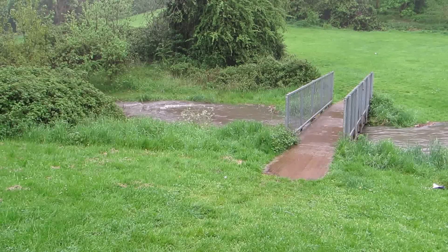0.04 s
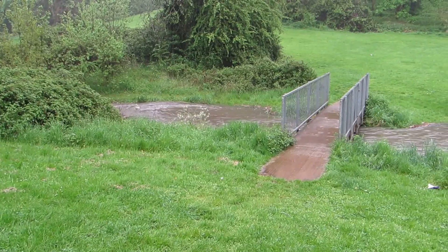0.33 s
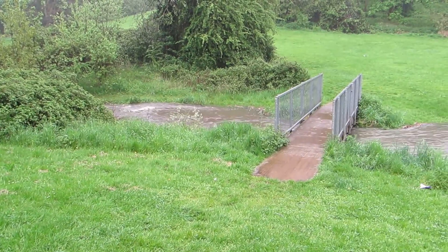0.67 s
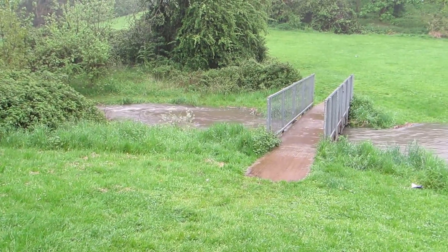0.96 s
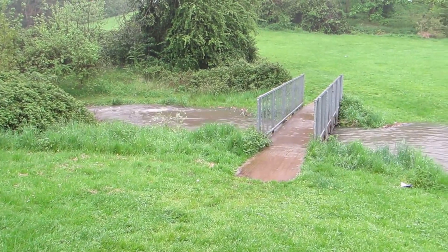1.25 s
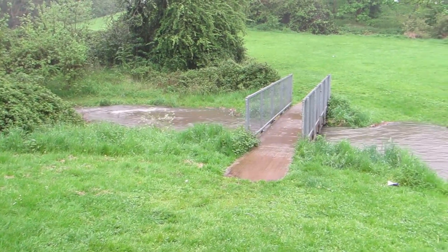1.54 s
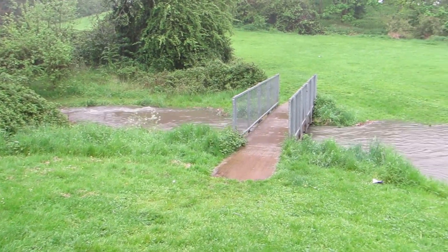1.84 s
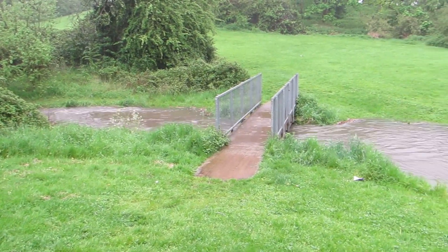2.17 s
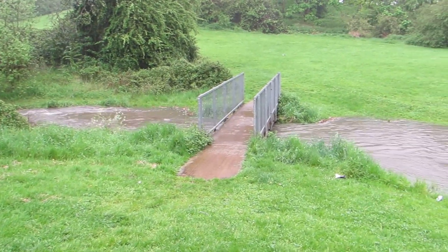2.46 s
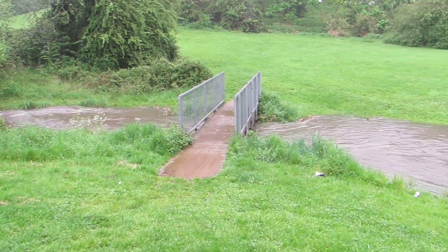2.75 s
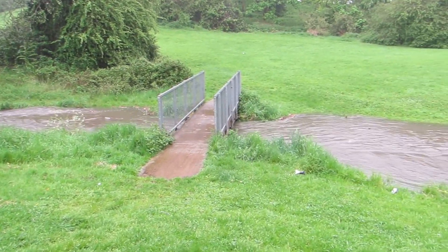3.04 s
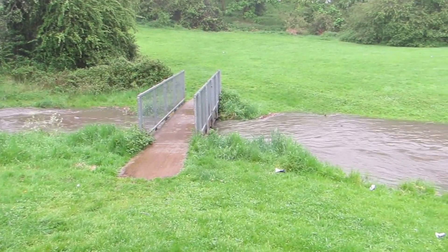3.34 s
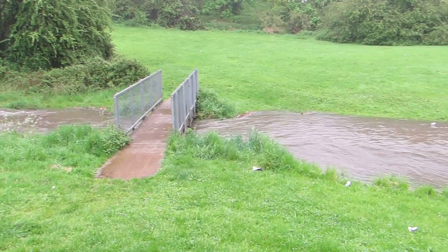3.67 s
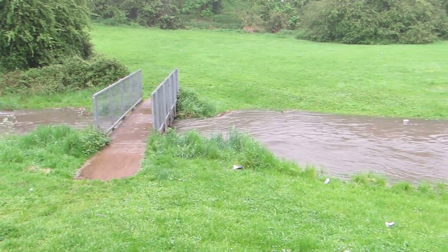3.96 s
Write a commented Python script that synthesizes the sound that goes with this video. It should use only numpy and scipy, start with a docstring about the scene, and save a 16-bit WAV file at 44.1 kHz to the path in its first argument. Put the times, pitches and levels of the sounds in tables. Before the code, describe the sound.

A swollen brook rushes and gurgles through a grassy field while small birds chirp and whistle. Light wind rumbles on the microphone, which is tapped once early on, and the water swells as the birds grow louder.

```python
"""From the start, a swollen brook rushes and gurgles while a light wind rumbles over a deep hum.
Small birds flute, chip and sing in the bushes on the left, their notes scattered by the trees.
After a faint tick, something taps the microphone near 0.9 s; its gain control turns everything
down, then slowly back up. The water swells, thin whistles join at 1.3 s and louder downward
slurs at 1.7 s, with a few more ticks among them."""
import sys
import numpy as np
from scipy import signal
from scipy.fft import rfft, irfft, next_fast_len
from scipy.io import wavfile
from scipy.ndimage import uniform_filter1d, map_coordinates

SR = 44100
rng = np.random.default_rng(int(sys.argv[2]) if len(sys.argv) > 2 else 0)


def wrap_up_sound(samples):
    """Save the sound to the file named by the first command line argument, as 16-bit audio."""
    columns = np.atleast_2d(samples).T
    # keep every value between -1 and 1, then stretch to whole-number steps
    tamed = np.clip(columns, -1, 1)
    steps = np.round(tamed * 32767).astype(np.int16)
    wavfile.write(sys.argv[1], SR, steps)


N = 176400  # 4 seconds


def amp(db):
    """Turn decibels into a number to multiply by."""
    return 10 ** (np.asarray(db) / 20)


def unit(x):
    """Scale x to an average strength (rms) of 1."""
    return x / np.sqrt(np.mean(x ** 2) + 1e-20)


def along(points, hz):
    """Read between (frequency, value) points, spaced as on a keyboard."""
    freqs, values = np.transpose(points)
    return np.interp(np.log(hz + 1), np.log(freqs + 1), values)


def curve(rows):
    """Join (time, value) points with straight lines."""
    return np.interp(np.arange(N) / SR, *np.transpose(rows))


def wobble(per_s, size=N):
    """A smooth curve through per_s random values a second."""
    return map_coordinates(rng.standard_normal(512), [np.arange(size) * per_s / SR], mode="wrap")


def filtered(x, response):
    """Multiply each frequency in x by response(hz)."""
    size = next_fast_len(N + SR // 2)
    return irfft(rfft(x, size) * response(np.fft.rfftfreq(size, 1 / SR)), size)[..., :N]


def toned(x, tone):
    """Shape the bass and treble of x with a (frequency, level) table."""
    return filtered(x, lambda hz: amp(along(tone, hz)))


def pan(db):
    """Make the left side db louder than the right."""
    return amp([[db / 2], [-db / 2]])


def add(track, start_s, x):
    """Mix x into track at start_s."""
    part = track[..., max(round(start_s * SR), 0):][..., :x.shape[-1]]
    part += x[..., :part.shape[-1]]


def rush(tone, alike, patchy_db):
    """Stereo noise with random loud and soft patches; alike is 1 for equal sides, -1 for opposite."""
    grid = signal.stft(rng.standard_normal((2, N)), nperseg=512)[2]
    patches = uniform_filter1d(rng.standard_normal(grid.shape[1:]), size=5, axis=0)  # blur over pitch
    patches = uniform_filter1d(patches, size=9, axis=1)  # and over time
    pair = signal.istft(grid * amp(patchy_db * unit(patches)), nperseg=512)[1][:, :N]

    def response(hz):
        angle = np.arccos(np.clip(along(alike, hz), -1, 1)) / 2
        return amp(along(tone, hz)) * [np.cos(angle), np.sin(angle)]
    mid, side = filtered(pair, response)
    return unit(np.array([mid + side, mid - side]))


def bubbles(per_s=900, middle_hz=1151.4, spread=0.5575, ring_cycles=8.2, rise=.12, size_db=3):
    """Many small bubbles, each a short ring that rises in pitch."""
    when, pitch, size, place = rng.random((int(per_s * N / SR), 4)).T[:, :, None]
    hz = middle_hz * np.exp(spread / 2 * np.clip(np.log(pitch / (1 - pitch)), -5, 5))
    samples = np.arange(1500)
    cycles = hz * samples / SR
    age = cycles / ring_cycles
    ring = np.sin(2 * np.pi * cycles * (1 + rise * np.minimum(age, 2) / 2))
    ring *= np.exp(-2 * age) * (1 - np.exp(-cycles))  # quick start, then a fade
    ring *= amp(size_db * np.minimum(-np.log(1 - size), 4))  # a few are much louder
    at = ((when * N).astype(int) + samples).ravel()
    sides = np.cos(place * np.pi / 2), np.sin(place * np.pi / 2)
    return unit(np.array([np.bincount(at, (ring * side).ravel(), N)[:N] for side in sides]))


# How the rushing swells: t/s, level/dB (relative)
WATER_LEVEL = [(0, -41.5), (.35, -38.5), (.75, -36), (1.1, -33.5), (1.55, -32.5), (2.2, -33.5), (2.7, -34),
               (3.4, -33.5), (4, -33)]
# Its mix of low and high sound: f/Hz, level/dB (relative)
WATER_TONE = [(60, -13), (130, -0.5), (270, 2.5), (480, -2.5), (1000, -1.5), (1650, -2), (2200, -5.5),
              (3300, -10), (5000, -13.5), (7000, -16.5), (8500, -28.5), (15000, -49)]
# How alike the water is left and right: f/Hz, likeness/(-1 to 1)
WATER_LIKENESS = [(150, 0.8), (500, 0.56), (1000, 0.7), (1700, 0.76), (2700, 0.37), (4500, 0.32),
                  (7000, 0.064)]
# How loud the low churning is: t/s, level/dB
CHURN_LEVEL = [(0, -51), (.5, -52), (.8, -42.5), (1.2, -40), (1.6, -38), (2.3, -43), (2.9, -37.5),
               (3.4, -40.5), (4, -40)]
# Its dull tone: f/Hz, level/dB (relative)
CHURN_TONE = [(70, -22), (110, 0), (200, -2), (300, -1.5), (370, -6), (480, -18), (900, -47)]
def brook():
    """Flood water rushes with bubbles in it and churns underneath."""
    water = rush(WATER_TONE, WATER_LIKENESS, patchy_db=1) + amp(-7.5) * bubbles()
    water_db = curve(WATER_LEVEL) + 1.5 + 0.35 * wobble(14)
    churn_db = curve(CHURN_LEVEL) + 1.8 * wobble(8.03)
    churn = rush(CHURN_TONE, WATER_LIKENESS, patchy_db=1)
    return pan(1) * amp(water_db) * water + amp(churn_db) * churn


# How loud the water's hiss is: t/s, level/dB (relative)
HISS_LEVEL = [(0, -59), (.4, -58), (.75, -56), (1.2, -52), (1.6, -52.5), (2.1, -54), (2.7, -57), (4, -58.5)]
# The bright tone of hiss and splashes: f/Hz, level/dB (relative)
HISS_TONE = [(6500, -27), (8200, -1.5), (11500, 2), (13500, -5), (14400, -9), (15200, -28)]
def spray(splashes_per_s=300, size_db=0.5):
    """The top of the brook hisses and crackles with tiny splashes of unequal size."""
    hiss = rush(HISS_TONE, alike=[(5000, .1), (8500, -0.12), (14000, -0.21)], patchy_db=.7)
    when, size, place = rng.random((int(splashes_per_s * N / SR), 3)).T
    strength = amp(size_db * np.minimum(-np.log(1 - size), 4))
    at = (when * N).astype(int)
    clicks = np.array([np.bincount(at, strength * side, N) for side in (place, place - 1)])
    splashes = unit(toned(clicks, HISS_TONE))
    return amp(curve(HISS_LEVEL)) * (hiss + amp(-2) * splashes)


# How strong the wind is: t/s, level/dB
WIND_LEVEL = [(0, -37.5), (.45, -42.5), (.75, -37.5), (1.2, -36.5), (1.55, -32), (2.3, -34), (2.6, -38.5),
              (3.3, -36.5), (3.85, -37), (4, -32)]
# Its bass-heavy tone: f/Hz, level/dB (relative)
WIND_TONE = [(22, -22), (35, -15), (51, -7.5), (68, 1), (90, -2.5), (125, -3.5), (190, -13.5), (350, -24.5),
             (900, -62)]
# How loud the deep hum is: t/s, level/dB
HUM_LEVEL = [(0, -51), (.45, -45), (.75, -40), (1.2, -41.5), (1.7, -42), (2.35, -41.5), (2.8, -41),
             (3.3, -41), (3.7, -43), (4, -39)]
def wind(hum_hz=41.5, waver_hz=2.2):
    """Wind rumbles unevenly over a wavering hum, both a little stronger on the right."""
    gusts = amp(curve(WIND_LEVEL) + 0.64 * wobble(10))
    rumble = gusts * rush(WIND_TONE, alike=[(40, 1), (200, 0.82)], patchy_db=0)
    phase = 2 * np.pi * np.cumsum(hum_hz + waver_hz * wobble(9)) / SR
    hum = np.sqrt(2) * amp(curve(HUM_LEVEL) + 1.2 * wobble(7)) * np.sin(phase)
    return pan(-2.2) * (rumble + hum)


def arch(length_s, pitches):
    """A pitch that bends through a start, a middle and an end."""
    return np.polyval(np.polyfit([0, .5, 1], pitches, 2), np.linspace(0, 1, int(length_s * SR)))


def settle(length_s, start_hz, target_hz, settle_s):
    """A pitch that slides toward a target and levels off."""
    return target_hz + (start_hz - target_hz) * np.exp(-np.arange(int(length_s * SR)) / SR / settle_s)


def tree_echo(x, trees_s=1.0, thicket_s=0.25, thicket_db=9, width=0.43):
    """The thicket scatters a short, dense echo and the trees add a longer one."""
    t = np.arange(SR) / SR
    shared, apart = rng.standard_normal((2, SR))
    fade = amp(-60 * t / trees_s) + amp(thicket_db - 60 * t / thicket_s)
    onset = 1 - np.exp(-t / 0.0037)
    tail = np.array([shared + width * apart, shared - width * apart]) * fade * onset
    return signal.fftconvolve(np.pad(x, (0, SR // 100))[None], tail / np.linalg.norm(tail[0]), axes=1)


def sing(notes, edge, waver, echo_db, flutter_db=2.1, left_lead_s=34e-6):
    """Unsteady, echoing bird notes; edge is the share spent fading in or out, waver a share of pitch."""
    song = np.zeros((2, N))
    for start_s, hz, db in notes:
        progress = np.linspace(0, 1, len(hz))
        shape = np.sin(np.pi / 2 * np.clip(np.minimum(progress, 1 - progress) / edge, 0, 1))
        phase = 2 * np.pi * np.cumsum(hz * (1 + waver * wobble(302, len(hz)))) / SR
        level = amp(db + flutter_db * wobble(70, len(hz)))
        call = np.sqrt(2) * shape * level * np.sin(phase)
        call /= np.hypot(1, amp(echo_db))  # note and echo share the level
        add(song, start_s, call)
        add(song, start_s, amp(echo_db) * tree_echo(call))
    early_s = np.array([[1], [-1]]) * left_lead_s / 2  # the left side hears it first
    return pan(2) * filtered(song, lambda hz: np.exp(2j * np.pi * hz * early_s))


# Soft, lower notes: t/s, length/s, start f/Hz, middle f/Hz, end f/Hz, level/dB
FLUTE_NOTES = [(0.028, 0.13, 2258, 2218, 2220, -43.5), (0.038, 0.2, 4260, 4170, 4250, -50),
               (.262, 0.15, 2210, 2235, 2188, -40.5), (0.391, 0.0614, 2936, 3240, 3310, -47.5),
               (.53, 0.083, 3120, 2750, 2730, -47), (1.086, 0.11, 3430, 3930, 4170, -40),
               (2.057, 0.031, 2960, 3020, 3020, -40), (2.2, 0.049, 3570, 3590, 3590, -42),
               (2.615, 0.053, 4330, 4080, 4000, -36), (2.675, 0.041, 3710, 3550, 3480, -43),
               (3.46, 0.036, 3130, 3265, 3200, -42.5)]
def fluting():
    """Distant birds sing gently bending, flute-like notes."""
    notes = [(s, arch(length, hz), db) for s, length, *hz, db in FLUTE_NOTES]
    return sing(notes, edge=0.13, waver=0.0066, echo_db=-1)


# Short, high notes: t/s, length/s, start f/Hz, middle f/Hz, end f/Hz, level/dB
CHIP_NOTES = [(.06, 0.068, 6600, 7310, 6200, -43.5), (0.081, .03, 7110, 6350, 6110, -31.5),
              (.969, 0.051, 6500, 7650, 6400, -28.5), (1.626, .038, 6900, 7550, 7170, -35.5),
              (1.858, 0.023, 7600, 7530, 7050, -39), (2.08, 0.023, 7600, 7610, 7050, -37),
              (2.298, 0.027, 7600, 7580, 7050, -37), (2.512, 0.029, 7600, 7550, 7150, -37.5),
              (3.757, 0.055, 6300, 7020, 6300, -37), (3.83, .07, 6900, 6830, 6300, -42)]
def chips():
    """A bird gives quick chirps, most of them arching up and down."""
    notes = [(s, arch(length, hz), db) for s, length, *hz, db in CHIP_NOTES]
    return sing(notes, edge=0.087, waver=.012, echo_db=3.2)


# Notes that drop and hold: t/s, held f/Hz, level/dB
TWO_TONE_NOTES = [(.145, 4550, -48), (.47, 5000, -43), (.765, 5600, -49), (1.104, 4050, -46),
                  (1.417, 4580, -44), (2.338, 4300, -44), (2.658, 4550, -41), (2.988, 4900, -42.5),
                  (3.282, 5600, -47), (3.655, 4800, -43)]
def two_tone_song(length_s=0.047, top_hz=7100, drop_s=0.0078):
    """A farther bird starts each note high, drops fast and holds the lower pitch."""
    notes = [(s, settle(length_s, top_hz, hz, drop_s), db) for s, hz, db in TWO_TONE_NOTES]
    return sing(notes, edge=.07, waver=0.0056, echo_db=-4.5)


# When the faint ticks come: t/s, level/dB (relative)
TICK_TIMES = [(0.444, -26), (1.533, -38), (1.650, -14.5), (1.653, -23), (2.84, -29)]
# Their crisp tone: f/Hz, level/dB (relative)
TICK_TONE = [(300, -6), (2500, 3), (6000, 2.5), (9000, -8), (15000, -16)]
def ticks(fade_s=0.0041):
    """Tiny dry ticks close by, each a burst of noise that dies at once."""
    track = np.zeros(N)
    t = np.arange(SR // 50) / SR
    for start_s, db in TICK_TIMES:
        add(track, start_s, amp(db - 60 * t / fade_s) * rng.standard_normal(len(t)))
    return pan(2.1) * toned(track, TICK_TONE)


# The tap's softened treble: f/Hz, level/dB (relative)
TAP_TONE = [(2500, 1), (6000, -5), (14000, -15)]
def tap(at_s=.8582, rise_s=0.00029, fall_s=0.000096, rebound_s=.0016, snap_s=0.0046):
    """One push on the microphone, with a snap and a slower spring back."""
    t = np.arange(N) / SR - at_s
    after = np.maximum(t, 0)
    push = np.exp(np.minimum(t, 0) / rise_s - after / fall_s)
    rebound = 0.22 * after / rebound_s * np.exp(1 - after / rebound_s)
    snap = amp(-6 - 60 * after / snap_s) * (t > 0) * rng.standard_normal(N)
    pop = np.array([[1], [-0.6]]) * (rebound - push)  # the two sides move opposite ways
    pop += np.array([[1], [.2]]) * snap
    return amp(1) * toned(pop, TAP_TONE)


# Thin, high notes: t/s, length/s, start f/Hz, target f/Hz, level/dB
WHISTLE_NOTES = [(1.264, 0.082, 7660, 7660, -31.5), (1.36, .08, 7640, 7730, -32),
                 (1.491, 0.09, 5890, 5336, -31), (1.547, 0.076, 5450, 5290, -35.5),
                 (1.789, 0.093, 7600, 7610, -33), (2.019, 0.072, 7510, 7730, -36.5),
                 (2.235, .075, 7680, 7660, -38.5), (2.455, 0.046, 7620, 7690, -39),
                 (2.771, .14, 5225, 5090, -32.5), (3.106, .14, 7500, 6980, -35.5),
                 (3.234, 0.11, 6980, 6820, -35), (3.608, 0.08, 5240, 5260, -35)]
def whistles():
    """A bird whistles notes that hold steady or slide a little and level off."""
    notes = [(s, settle(length, *hz, length / 2), db) for s, length, *hz, db in WHISTLE_NOTES]
    return sing(notes, edge=0.15, waver=0.0063, echo_db=-1)


# Loud falling notes: t/s, level/dB
SLUR_NOTES = [(1.708, -29.5), (1.927, -27.5), (2.147, -29), (2.366, -28.3), (3.893, -32)]
def slurs(length_s=.058, pitches_hz=(6500, 5585, 4105)):
    """A bird repeats one quick downward sweep."""
    notes = [(s, arch(length_s, pitches_hz), db) for s, db in SLUR_NOTES]
    return sing(notes, edge=0.17, waver=0.0247, echo_db=4.1)


def scene():
    """Add up the sounds in the order they first appear."""
    background = brook() + spray() + wind()
    return background + fluting() + chips() + two_tone_song() + ticks() + tap() + whistles() + slurs()


# Narrow bands the camera filters out: f/Hz, half width/Hz, depth/(0 to 1)
CAMERA_NOTCHES = [(3985, 250, 0.64), (7840, 160, 0.95)]
def record(dry, limit_db=-13, max_duck_db=4.5, recover_db_per_s=3.5, start_s=.057, top_hz=15100):
    """The camera's filter dulls two narrow treble bands; its gain drops after a peak, then recovers."""
    def notches(hz):
        dips = [1 - depth / (1 + ((hz - f) / width) ** 2) for f, width, depth in CAMERA_NOTCHES]
        return np.prod(dips, axis=0)
    x = filtered(dry, notches)
    peak_db = 20 * np.log10(np.abs(x).max(axis=0) + 1e-9)
    over_db = np.clip(peak_db - limit_db, 0, max_duck_db)
    t = np.arange(N) / SR
    recovery_db = recover_db_per_s * t
    duck_db = np.maximum.accumulate(over_db + recovery_db) - recovery_db
    x *= amp(-np.interp(t - .003, t, duck_db))  # reacts 3 ms late, so the tap gets through
    x *= t > start_s  # a moment of silence first
    return filtered(np.clip(x, -1, 1), lambda hz: hz < top_hz)


dry = scene()
out = record(dry)
wrap_up_sound(out)
```